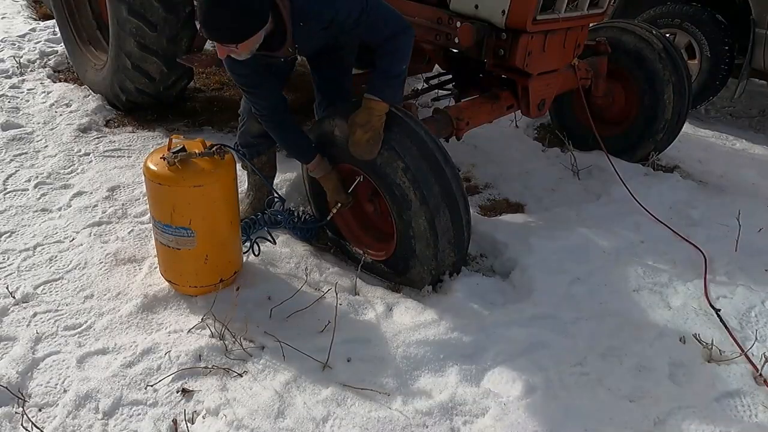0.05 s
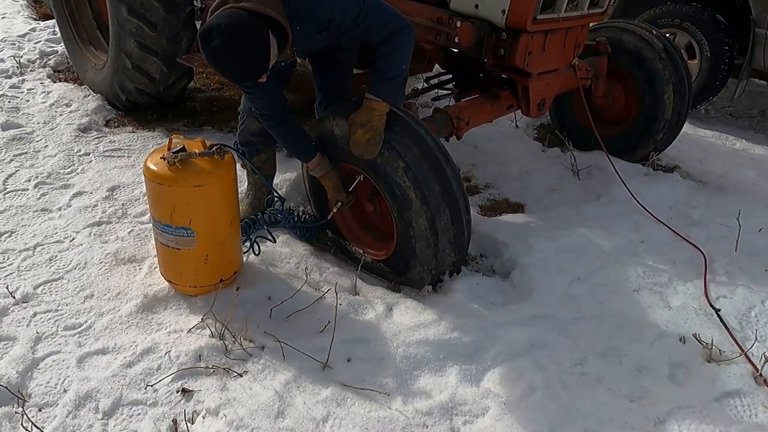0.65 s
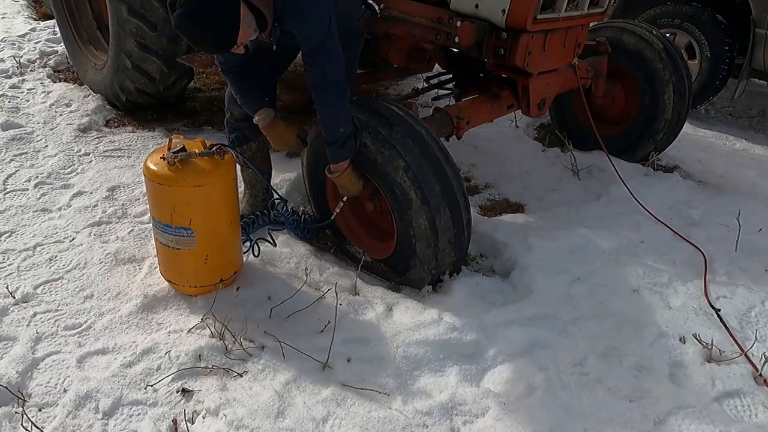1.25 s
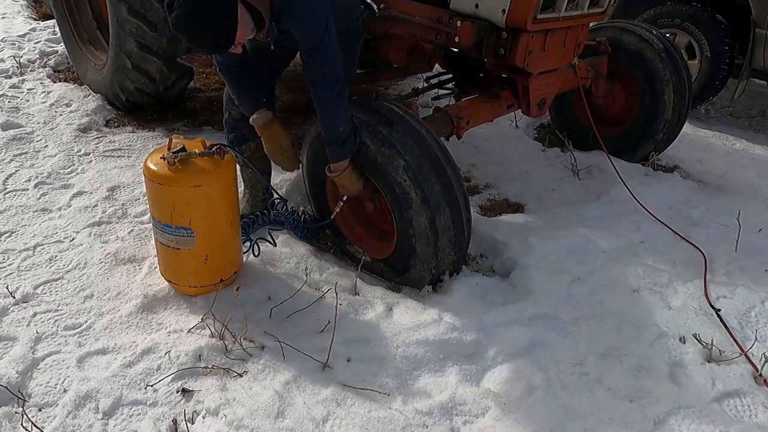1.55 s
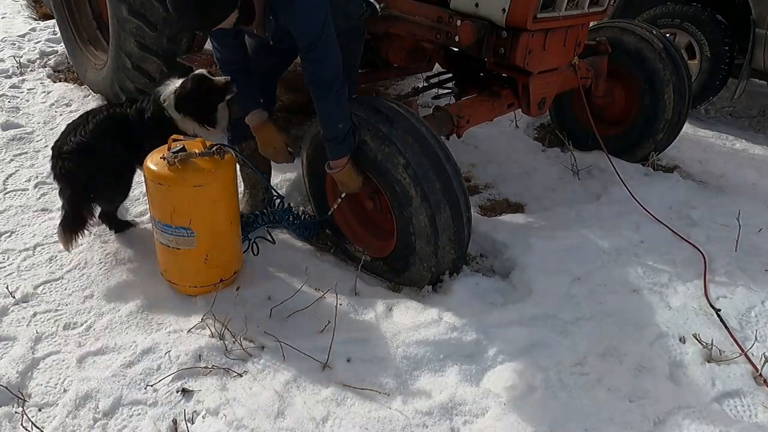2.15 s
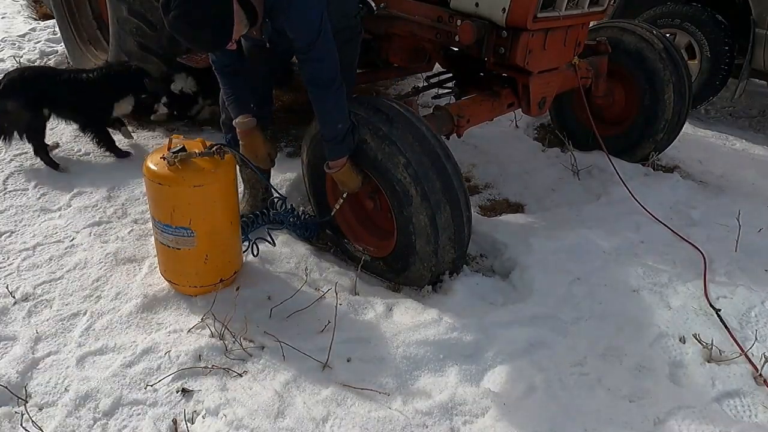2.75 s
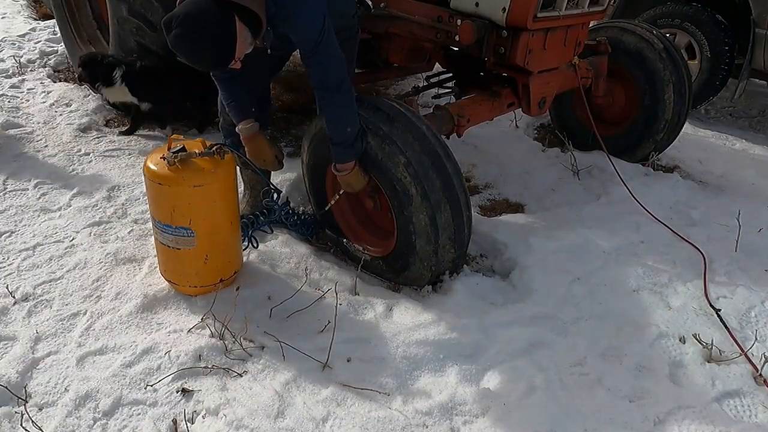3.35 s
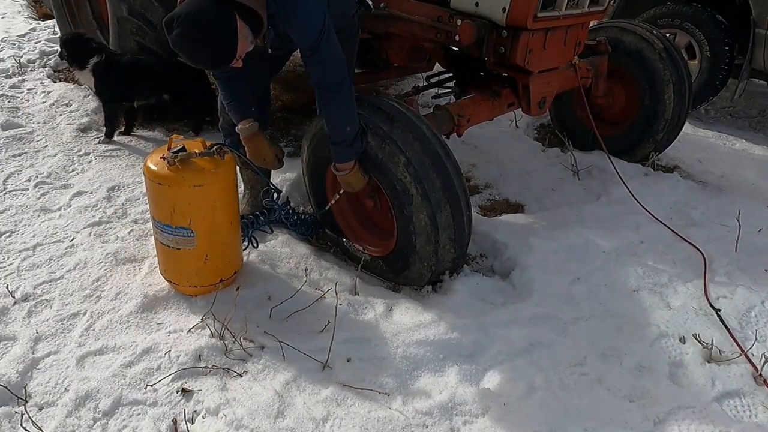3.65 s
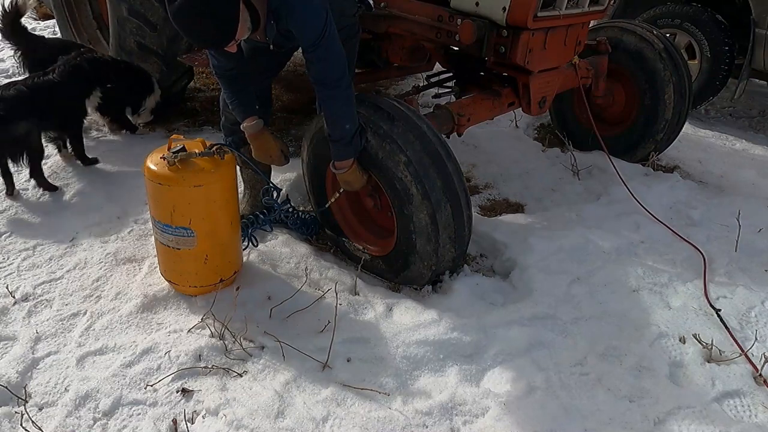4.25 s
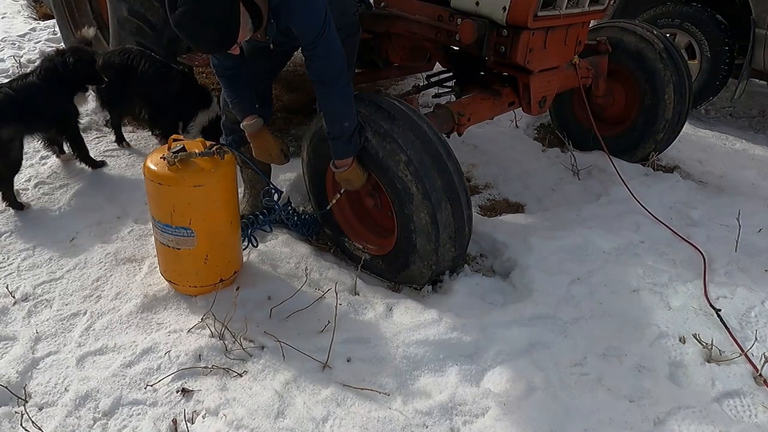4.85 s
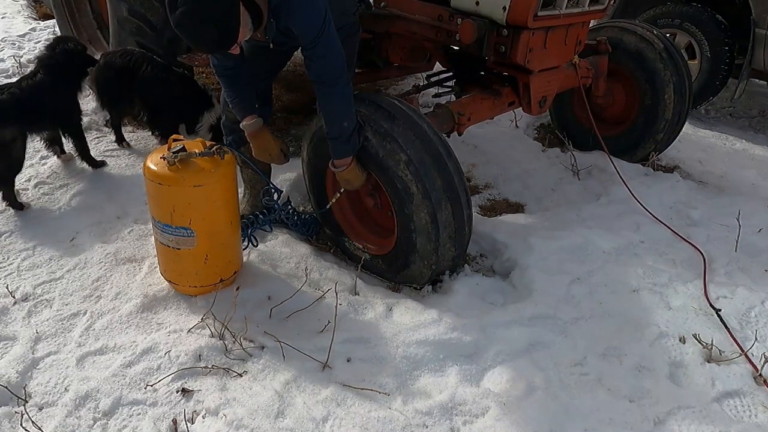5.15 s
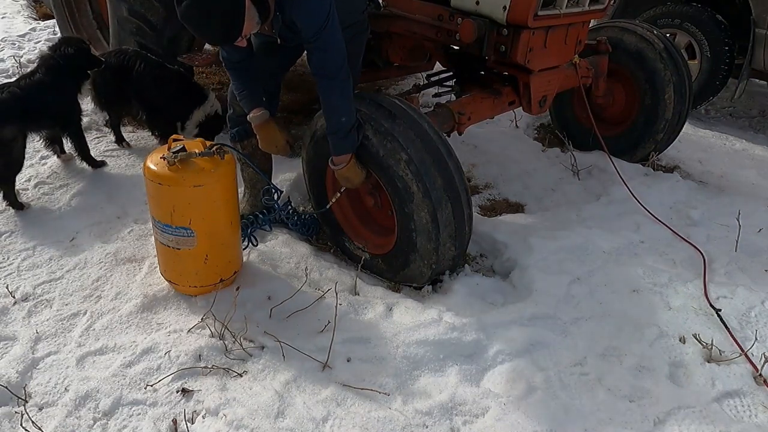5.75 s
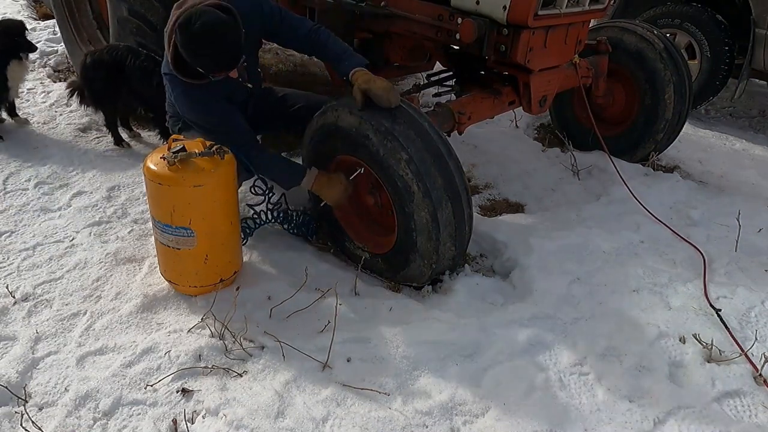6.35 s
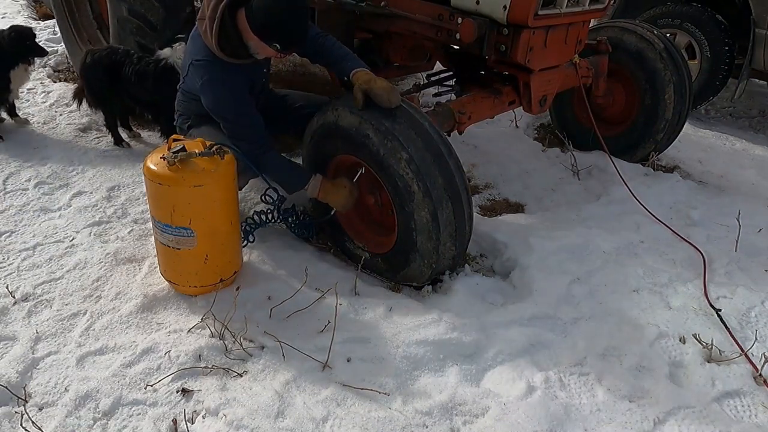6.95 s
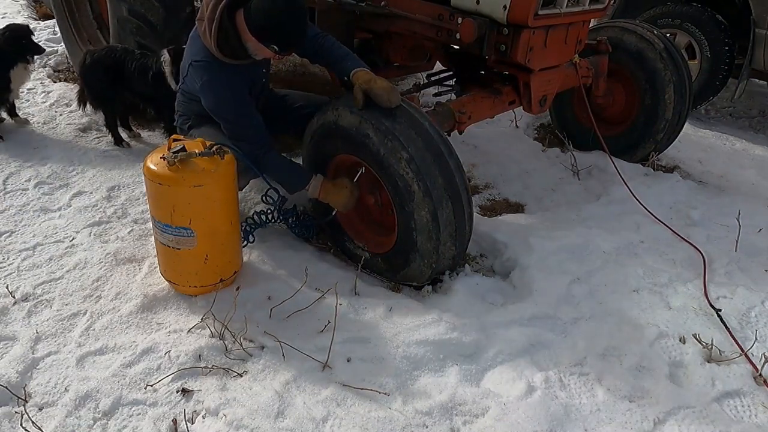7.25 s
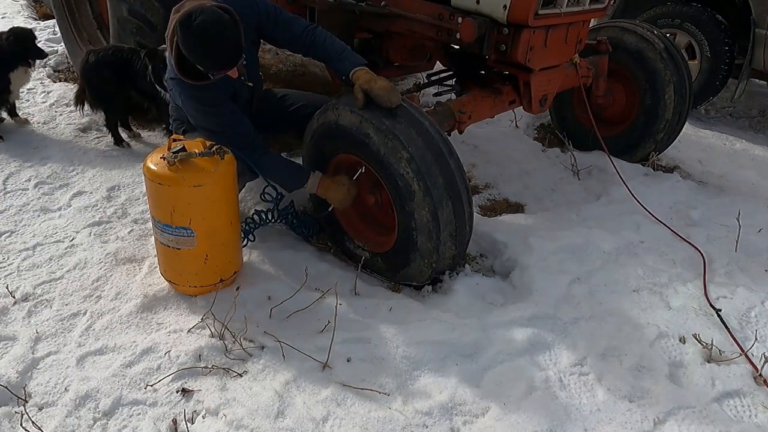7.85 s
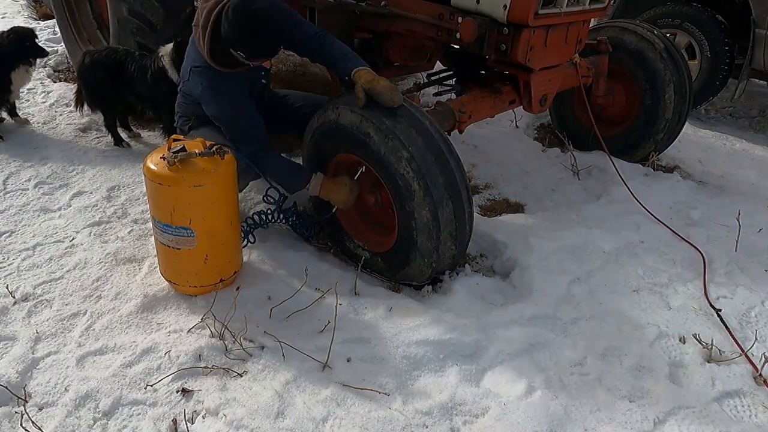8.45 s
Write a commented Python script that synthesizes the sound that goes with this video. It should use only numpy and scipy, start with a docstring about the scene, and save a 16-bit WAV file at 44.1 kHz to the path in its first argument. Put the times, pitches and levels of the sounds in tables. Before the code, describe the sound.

A small electric motor whines steadily while air hisses into a tractor tyre, with brief rubber squeaks, shuffling and dull knocks.

```python
"""Outdoors in the snow, a tractor tyre is filled from a portable air tank. Close by, a small motor
whines in harmonics of its rotation, 33 turns a second with twelve brush ticks to the turn.
Turbulent air hisses in the hose and whistles at the valve. Clothes and feet shuffle, boots and
knocks on the tyre give damped thuds, and the chuck's rubber seal squeaks by stick-slip friction."""
import sys
import numpy as np
from scipy.fft import rfft, irfft, next_fast_len
from scipy.io import wavfile
from scipy.ndimage import uniform_filter1d, map_coordinates

SR = 44100
rng = np.random.default_rng(int(sys.argv[2]) if len(sys.argv) > 2 else 0)


def store_wav(level_fs):
    """Save 16-bit WAV to argv[1]."""
    pcm = np.round(np.clip(np.atleast_2d(level_fs), -1, 1) * 32767)
    wavfile.write(sys.argv[1], SR, pcm.T.astype(np.int16))


N = 374894


def amp(db):
    """Amplitude ratio of a level in decibels."""
    return 10 ** (np.asarray(db) / 20)


def unit(x):
    """Normalisation to rms 1."""
    return x / np.sqrt(np.mean(x ** 2) + 1e-20)


def wobble(rate):
    """Smooth random modulation, interpolated through rate knots a second."""
    return map_coordinates(rng.standard_normal(int(N * rate / SR) + 4), [np.arange(N) * rate / SR])


def jitter(shape, size):
    """Random fluctuation of rms 1: a moving average of noise over size samples."""
    return unit(uniform_filter1d(rng.standard_normal(shape), size=size))


def swell(start, length, rise, fall):
    """Trapezoidal envelope, at half height at start and at start + length (all in s)."""
    t = np.arange(N) / SR - start
    return np.clip(np.minimum(t / rise, (length - t) / fall) + .5, 0, 1)


def filtered(x, response):
    """Linear filtering: the spectrum of x times a complex frequency response."""
    size = next_fast_len(N + SR // 2)
    return irfft(rfft(x, size) * response(np.fft.rfftfreq(size, 1 / SR)), size)[:N]


def noise(spectrum):
    """Spectral shaping of white noise by points (f/Hz, relative level/dB); rms 1."""
    f, db = np.transpose(spectrum)
    colour = lambda hz: amp(np.interp(np.log(hz + 1), np.log(f), db))
    return unit(filtered(rng.standard_normal(N), colour))


def resonate(x, modes):
    """Forced vibration: x drives steep-skirted modes (f/Hz, width/Hz, relative level/dB); rms 1."""
    mode = lambda f, centre, width: (2j * f * width / (centre ** 2 - f ** 2 + 2j * f * width)) ** 2
    return unit(filtered(x, lambda f: sum(amp(db) * mode(f, hz, width) for hz, width, db in modes)))


def add(track, start, sound):
    """Superposition of a sound on the track from start (s)."""
    part = track[max(round(start * SR), 0):][:len(sound)]
    part += sound[:len(part)]


TURN_HZ, SEGMENTS = 33.06, 12  # shaft frequency; commutator segments
# Harmonics of the shaft frequency: order, relative level/dB
SHAFT_ORDERS = [(4, -29), (8, -17), (12, 0), (13, -10), (14, -16), (17, -23), (18, -13.5), (19, -11.5),
                (20, -14), (21, -16), (22, -5.5), (23, -15), (24, -3.5), (25, -22), (26, -26), (30, -20),
                (31, -23), (32, -23), (34, -19), (35, -21), (36, -11.5), (37, -15.5), (38, -21), (39, -22),
                (40, -12.5), (41, -22), (42, -21), (43, -24), (44, -29), (47, -30)]
# Spells in which the whine thins and a high overtone sings: t/s, duration/s
SINGING_SPELLS = [(2.18, .14), (3.06, .7), (8.38, .3)]


def motor_whine(turns):
    """Harmonic series of the shaft; dispersion in the frame smears each turn's beat into an even buzz."""
    lag = .39  # cycles per squared order
    harmonic = lambda k: np.cos(2 * np.pi * (k * turns - lag * k ** 2))
    singing = sum(swell(start, length, rise=.046, fall=.046) for start, length in SINGING_SPELLS)
    whine = np.zeros(N)
    for k, db in SHAFT_ORDERS:
        dip_db = -1 * singing if k % SEGMENTS else 0  # only orders between the brush tones dip
        whine += amp(db + .56 * wobble(5.7) + dip_db) * harmonic(k)
    creep_db = -1.8 * np.clip(1 - np.arange(N) / SR / 2.3, 0, 1)  # slightly soft at first
    overtone = amp(-52 + 7 * singing) * harmonic(54)
    return amp(-24.5 + creep_db) * unit(whine) + overtone


def rubbing(turns, fresh):
    """Sliding friction: the same roughness passes in every turn, with a share of fresh noise."""
    surface = rng.standard_normal(round(SR / TURN_HZ))
    repeated = map_coordinates(surface, [turns % 1 * len(surface)], mode="grid-wrap")
    return np.sqrt(1 - fresh) * repeated + np.sqrt(fresh) * rng.standard_normal(N)


def segment_pulses(turns, sharpness, uneven_db):
    """Amplitude modulation: one pulse per commutator segment, each of its own strength."""
    strength = amp(uneven_db * unit(rng.standard_normal(SEGMENTS)))
    segment = np.floor(turns * SEGMENTS).astype(int) % SEGMENTS
    return strength[segment] * np.exp(-sharpness * np.cos(2 * np.pi * SEGMENTS * turns))


# Resonances of the motor housing: f/Hz, width/Hz, relative level/dB
HOUSING_MODES = [(1785, 70, 1), (2380, 130, -5), (2920, 130, -7), (3520, 80, 1), (3950, 80, 1),
                 (4130, 60, -5), (4370, 130, -3), (4770, 130, 0), (5290, 80, -3), (5900, 200, -2),
                 (6350, 150, -9), (7080, 150, -10)]


def rotor_rub(turns):
    """Friction of the rotor forces the housing to vibrate in its modes."""
    friction = rubbing(turns, fresh=.1) * segment_pulses(turns, sharpness=.6, uneven_db=1.5)
    return amp(-43) * resonate(friction, HOUSING_MODES)


# Narrow treble resonances rung by the brushes: f/Hz, width/Hz, relative level/dB
BRUSH_MODES = [(8250, 130, -5), (8690, 130, -5), (9005, 35, -1), (9275, 70, 1), (9415, 110, 2),
               (9730, 140, -3), (10430, 200, -10), (11000, 200, -15), (11480, 140, -6), (11780, 100, -14),
               (12150, 200, -12), (13650, 700, -15)]


def brush_ticks(turns):
    """Pulsed friction on the commutator excites resonances, so the brushes tick and whistle."""
    friction = rubbing(turns, fresh=.4) * segment_pulses(turns, sharpness=1.8, uneven_db=1.2)
    return amp(-43) * resonate(friction, BRUSH_MODES)


def rotor_scrape(turns):
    """Periodic contact: a high spot on the rotor excites one resonance once a turn."""
    contact = np.exp(6 * np.cos(2 * np.pi * turns))
    return amp(-52) * resonate(rubbing(turns, fresh=.15) * contact, [(2900, 230, 0)])


# Spectrum of the bearing noise: f/Hz, relative level/dB
BEARING_SPECTRUM = [(100, -11), (220, -6), (420, -2), (520, -3.5), (720, -3), (900, -5), (1100, 0.5),
                    (1350, -8.5), (1550, -17), (2200, -20), (4000, -57)]


def motor():
    """Rotation keeps whine, rub, ticks and scrape phase-locked, over broadband bearing noise."""
    shaft_hz = TURN_HZ * (1 + .001156 * wobble(18) + .000839 * wobble(70))  # the speed hunts slightly
    turns = np.cumsum(shaft_hz) / SR
    rotation = motor_whine(turns) + rotor_rub(turns) + brush_ticks(turns) + rotor_scrape(turns)
    return rotation + amp(-38.5) * noise(BEARING_SPECTRUM)


# Spectrum of the hiss: f/Hz, relative level/dB
HISS_SPECTRUM = [(300, -47), (1500, 3.5), (2500, -5.5), (3300, -5.5), (4500, 0), (6200, -3), (7600, -4.5),
                 (8800, -1.5), (11000, -4), (13500, -5), (15700, -7.5)]
# Air escaping as the chuck shifts: t/s, rise time/s, peak level/dB, T60/s
CHUCK_LEAKS = [(0, .02, -36, 1.6), (1.05, .04, -31.5, 1.3), (6.22, .12, -35, 0.22)]
# Swells of the valve whistle: t/s, duration/s, gain/dB
VALVE_SWELLS = [(1.08, .32, 1.5), (7.1, .4, 3)]


def air_hiss():
    """Turbulent flow hisses and whistles at the valve; steady flow and leaks add in power."""
    t = np.arange(N) / SR
    power = amp(-39) ** 2  # steady flow through the seated chuck
    for start, rise, db, t60 in CHUCK_LEAKS:
        opening = np.clip((t - start) / rise, 0, 1)
        decay_db = -60 * np.maximum(t - start - rise, 0) / t60
        power = power + (opening * amp(db + decay_db)) ** 2
    whistle = resonate(rng.standard_normal(N), [(9350, 450, 0)])
    swell_db = sum(db * swell(start, length, rise=.15, fall=.15) for start, length, db in VALVE_SWELLS)
    flow = np.sqrt(power) * amp(.092 * wobble(6.8))
    return flow * (noise(HISS_SPECTRUM) + amp(-6 + swell_db) * whistle)


# Spectra of the rumble of movement and of scuffed snow: f/Hz, relative level/dB
RUMBLE_SPECTRUM = [(12, -30), (20, 3), (59, 4), (195, 2.5), (267, -4.5), (293, -36), (330, -1), (430, 6.5),
                   (730, -120)]
SCUFF_SPECTRUM = [(60, -11.5), (150, -4), (280, -1), (600, -4.5), (1200, -11.5), (2200, -40), (5000, -45),
                  (15000, -44)]
# Spells of shuffling: t/s, duration/s, rumble level/dB, scuff level/dB
MOVEMENTS = [(0, 0.52, -41, -32.5), (0.589, 0.28, -44, -34), (0.938, 0.49, -42, -32),
             (1.44, .55, -45.5, -37), (2.136, 0.24, -42, -37.5), (2.348, .5, -50, -39.5),
             (3.51, .28, -45.5, -44), (4.483, 0.47, -47, -42), (4.975, 0.22, -44, -37.5),
             (5.34, 0.37, -47, -41), (5.665, 0.64, -44, -36.5), (7.185, 0.34, -53, -45),
             (7.465, 0.54, -46.5, -37.5), (8.05, 0.37, -48, -45.5)]


def shuffling():
    """Friction noise of clothes and feet follows their uneven pressure: dull rumble, grainy scuffing."""
    rumble, scuff = amp(-63), amp(-56.5)  # the stir between movements
    for start, length, rumble_db, scuff_db in MOVEMENTS:
        spell = swell(start, length, rise=.024, fall=.028)
        rumble = np.maximum(rumble, amp(rumble_db) * spell)
        scuff = np.maximum(scuff, amp(scuff_db) * spell)
    pressure = wobble(24)
    rumble *= amp(2.4 * pressure) * noise(RUMBLE_SPECTRUM)
    scuff *= amp(2 * pressure + 2.4 * wobble(300)) * noise(SCUFF_SPECTRUM)
    return rumble + scuff


# Light boot steps and knocks on the tyre: t/s, thud level/dB, thud f/Hz, crunch level/dB
IMPACTS = [(.022, -26, 202, -25), (.145, -32, 70, -36), (.381, -30, 89, -23.5), (.61, -32, 182, -32),
           (.8, -38, 122, -33), (1.061, -30, 108, -21.5), (1.076, -19, 257, -27), (1.117, -36, 277, -28),
           (1.222, -37, 84, -46), (1.361, -32, 123, -27), (1.49, -37, 69.5, -35), (1.619, -35, 60, -28),
           (1.658, -29, 196, -30), (2.17, -38, 99, -46), (2.282, -34, 119, -30), (2.8, -41, 60, -46),
           (3.445, -38, 70, -48), (5.156, -38, 100, -42), (5.7, -29, 191, -37), (6.255, -38, 91, -40),
           (8.095, -27, 158.5, -42), (8.106, -23.5, 325, -43)]


def steps_and_knocks():
    """Each impact is a heavily damped oscillation with a noise burst from packed snow."""
    thuds, crunch_gain = np.zeros(N), np.zeros(N)
    t = np.arange(SR // 2) / SR
    attack_s, t60_s = .004, .11  # snow and rubber damp every blow alike
    envelope = (1 - np.exp(-t / attack_s)) ** 2 * amp(-60 * t / t60_s)
    envelope /= envelope.max()
    for start, thud_db, thud_hz, crunch_db in IMPACTS:
        pitch = thud_hz * (1 + .3 * jitter(len(t), size=150))  # the snow gives way unevenly
        add(thuds, start, amp(thud_db) * envelope * np.sin(2 * np.pi * np.cumsum(pitch) / SR))
        add(crunch_gain, start, amp(crunch_db) * envelope)
    snow = noise([(80, -46), (250, -2), (500, -2.5), (1200, -6), (2600, -18.5), (4000, -33),
                  (15000, -51)])
    grains = amp(4.8 * wobble(500))
    return thuds + crunch_gain * unit(snow * grains)


def bell(x, centre, width):
    """Gaussian weighting of height 1."""
    return np.exp(-((x - centre) / width) ** 2)


# Slips of the seal: t/s, duration/s, mid-slip f/Hz, glide as a share of f, level/dB,
# formant f/Hz, formant level/dB relative to the second partial
SEAL_SLIPS = [(0.073, .034, 1550, -0.081, -32.5, 4800, -2), (0.102, 0.032, 1310, -0.17, -29, 3970, -21),
              (.147, .03, 1990, .28, -31.5, 5000, 0), (0.179, 0.019, 1354, -.43, -31.5, 4300, -0.5),
              (0.22, 0.017, 1250, -0.039, -33, 4000, -24), (0.237, 0.041, 1464, -0.044, -32.5, 4500, -15),
              (0.279, 0.023, 1620, -.04, -29, 7200, -10), (0.317, .025, 1710, 0.026, -33, 8240, 6.5),
              (.348, .02, 1410, 0.15, -27.5, 5000, -15), (.364, 0.039, 2220, -.1, -24, 6500, -19),
              (.409, 0.034, 1256, .02, -31, 13100, -13), (0.433, 0.046, 1123, -0.28, -31, 4900, -4.5),
              (1.743, 0.019, 1445, 0.16, -33.5, 5700, 4), (2.26, 0.02, 1516, -0.19, -32, 4400, -4),
              (2.42, 0.016, 1540, -0.23, -33.5, 5800, 6), (2.62, 0.067, 1244, -0.15, -45, 5370, 12)]


def seal_squeaks():
    """Stick-slip of rubber on the valve stem gives raspy arches of pitch with a strong second partial."""
    out = np.zeros(N)
    k = np.arange(1, 12)[:, None]  # partial numbers
    for start, length, hz, slide, db, formant_hz, formant_db in SEAL_SLIPS:
        n = round(length * SR)
        progress = np.linspace(0, 1, n)
        pitch_ratio = hz / 1482  # relative to an ordinary slip
        sag = .15 * pitch_ratio ** 2.5 * (2 * progress - 1) ** 2
        glide = hz * (1 + slide * (progress - .5) - sag)
        # uneven slipping smears the high partials
        partial_hz = k * glide * (1 + .018 * jitter(n, size=20) + .011 * jitter(n, size=250))
        formant = amp(formant_db) * bell(partial_hz, formant_hz, 1900)
        # the seal's topmost resonance flares late in high, hard slips
        shrill = amp(-15.5 + 28 * np.log2(pitch_ratio)) * bell(partial_hz, 13800, 1800)
        overtones = formant + amp(-7) / k + shrill * bell(progress, .74, .24)
        weights = np.where(k == 2, 1, overtones) * (partial_hz < SR / 2)
        grip = amp(2.5 * jitter(weights.shape, size=300) + 2.5 * jitter(n, size=30))
        phase = 2 * np.pi * np.cumsum(partial_hz, axis=1) / SR
        tone = np.sum(weights * grip * np.sin(phase), axis=0)
        envelope = np.sqrt(np.abs(np.sin(np.pi * progress)))
        add(out, start, amp(db) * envelope * tone)
    return out


def scene():
    """Linear superposition of all sources at one point, alike in both channels."""
    mono = motor() + air_hiss() + shuffling() + steps_and_knocks() + seal_squeaks()
    return np.array([mono, mono])


def record(dry):
    """Band limiting by an ideal low-pass filter."""
    cutoff_hz = 15750
    return np.array([filtered(channel, lambda hz: hz < cutoff_hz) for channel in dry])


dry = scene()
out = record(dry)
store_wav(out)
```